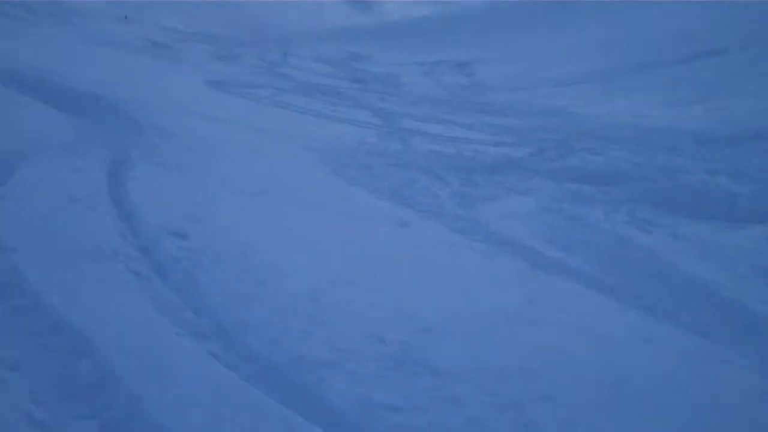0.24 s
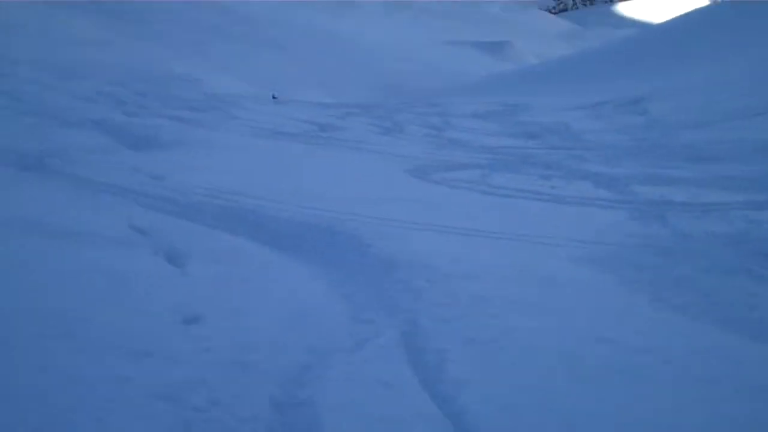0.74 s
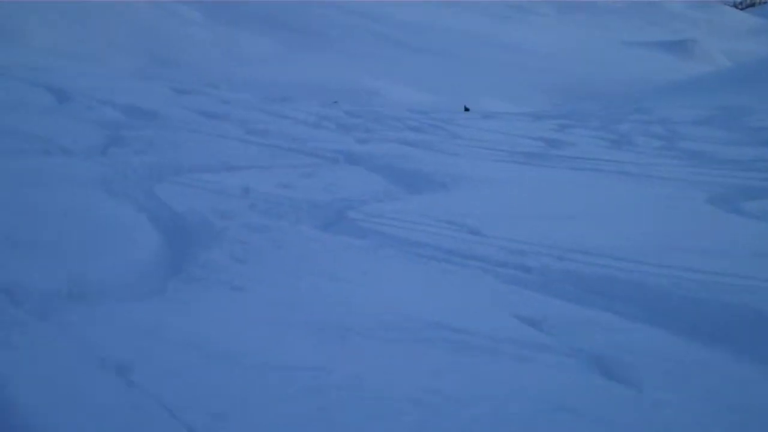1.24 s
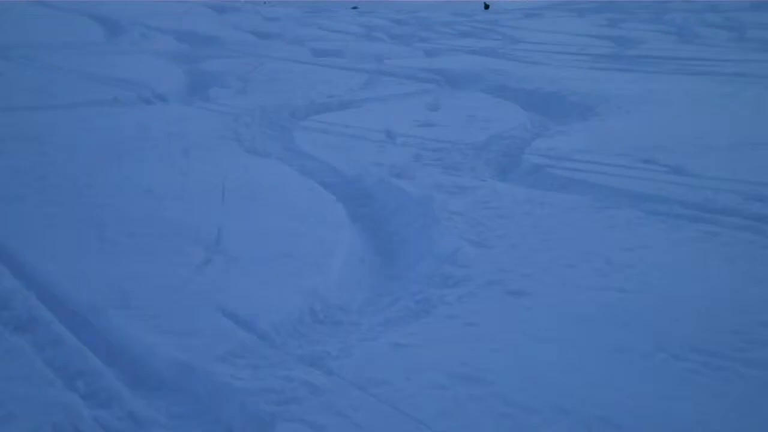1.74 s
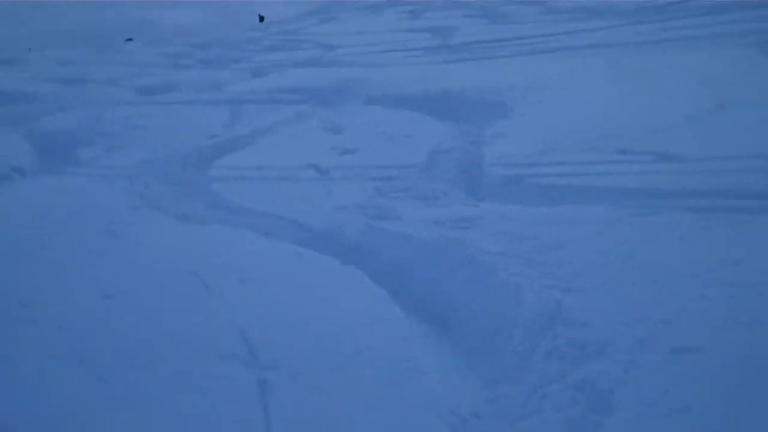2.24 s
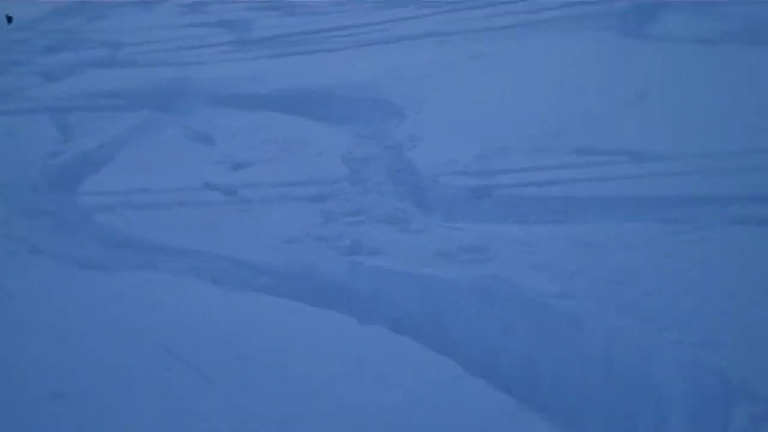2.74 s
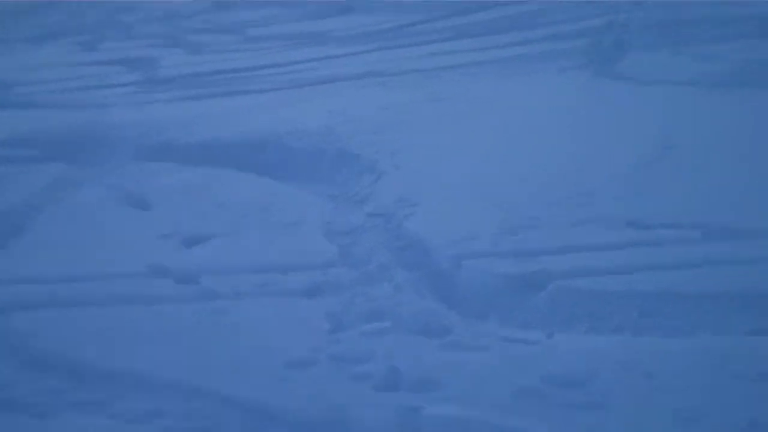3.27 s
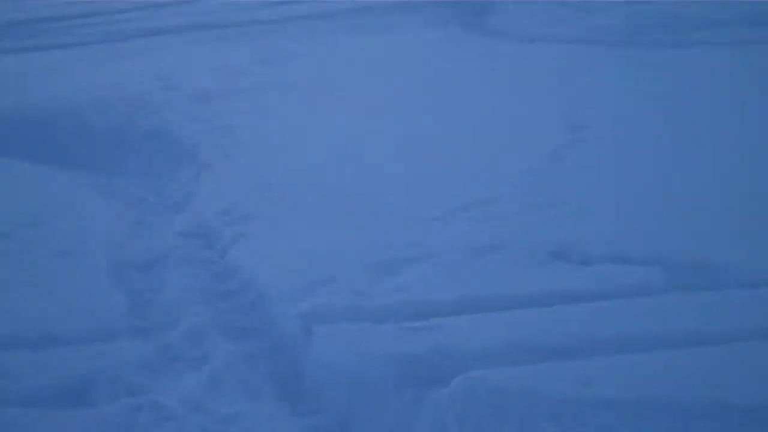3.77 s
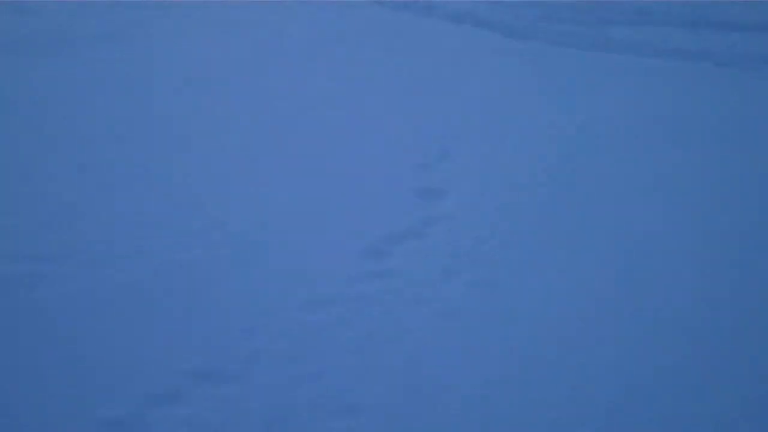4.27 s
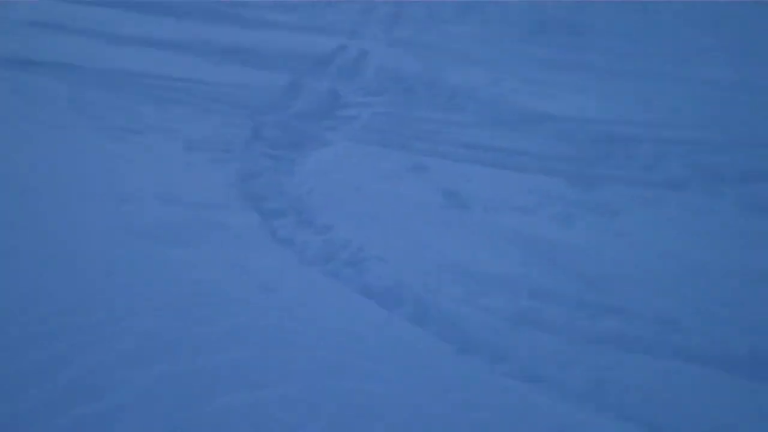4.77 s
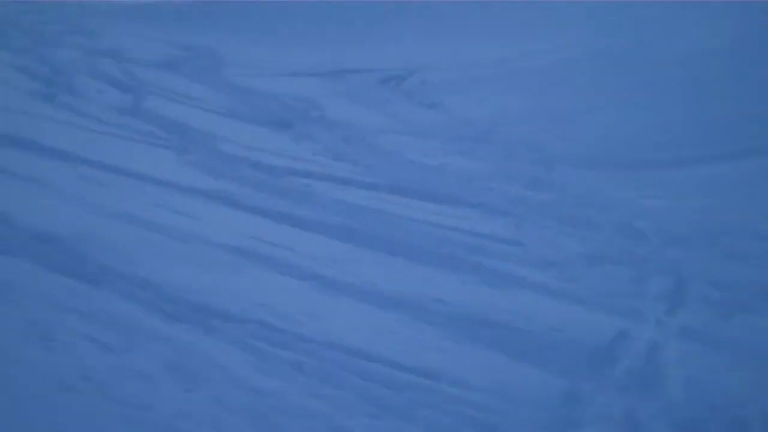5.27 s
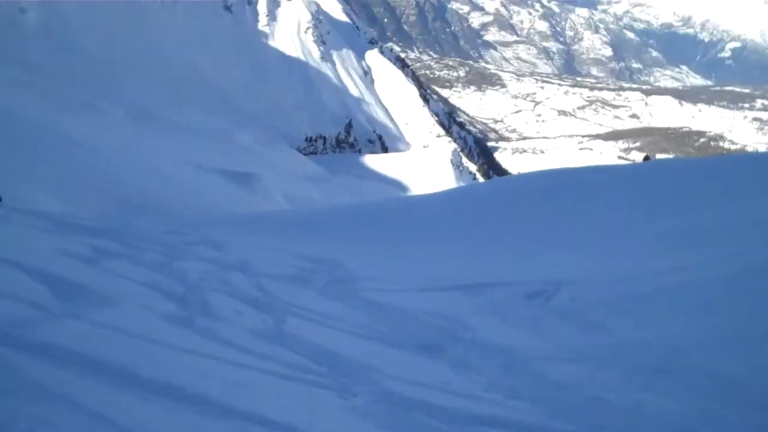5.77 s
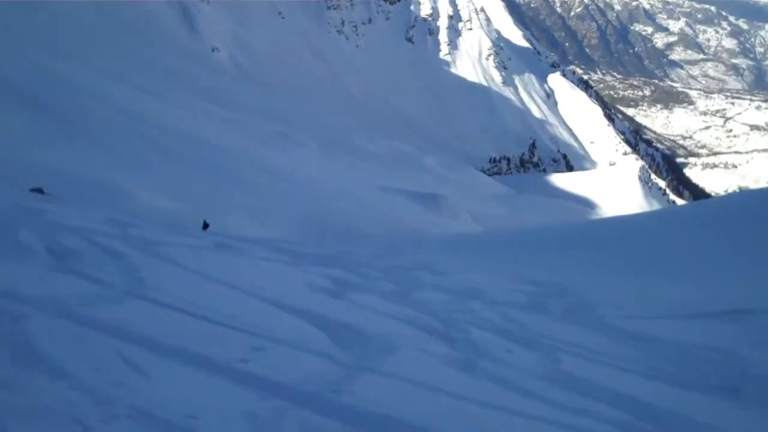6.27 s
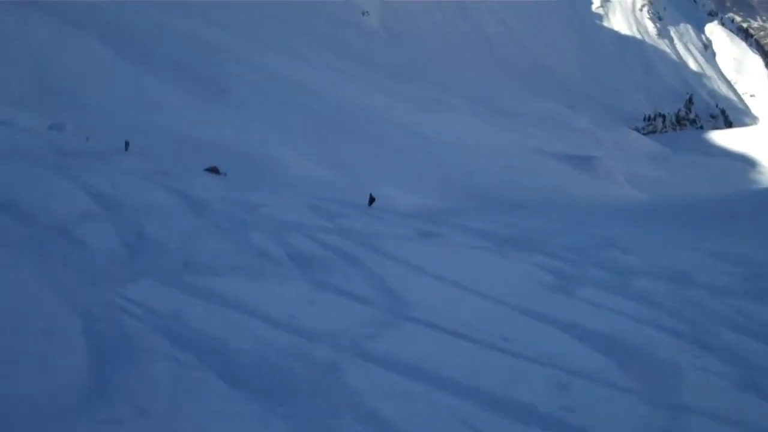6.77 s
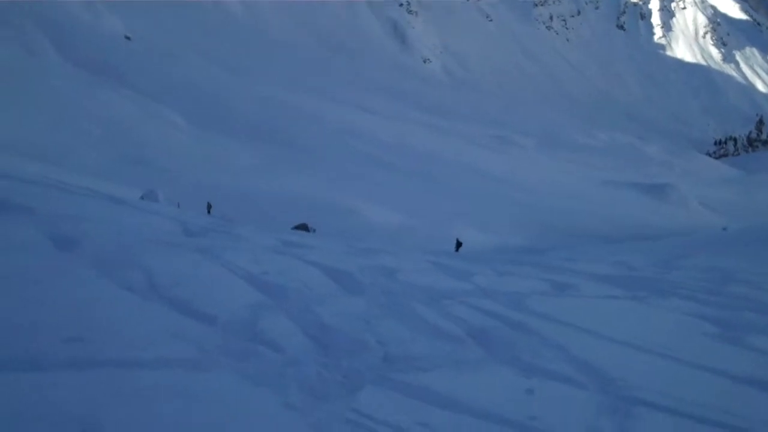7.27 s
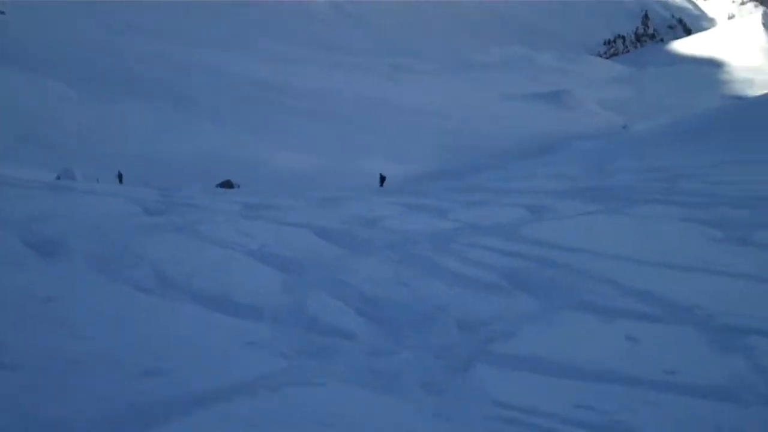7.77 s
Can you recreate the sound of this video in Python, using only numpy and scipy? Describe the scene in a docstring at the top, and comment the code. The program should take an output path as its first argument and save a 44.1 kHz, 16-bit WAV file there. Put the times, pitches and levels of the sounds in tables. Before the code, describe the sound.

Skis slide over snow for about eight seconds, heard close from a microphone carried by the skier. A bright, grainy hiss runs throughout, swelling and easing with the pressure on the skis. Short scrapes with a thin ringing tone flicker through it as the edges bite into crust. The hiss is loudest in the first 0.6 seconds. At about 1 second the gear gives a single hard plastic knock. The sliding eases between 2 and 3.5 seconds, then firms up with a cluster of scrapes from about 3.7 to 5 seconds. It swells again from 5.5 to 6.3 seconds and turns quieter after 7, with a few last scrapes. Faint, dull ticks fall near 1.3, 2.2, 2.6, 4.2 and 7.5 seconds. Air rushes past evenly the whole time, with soft, low gusts buffeting the microphone, most noticeably at the start, around 5 to 6 seconds and at the end.

```python
"""On a ski slope, heard through one microphone carried by the skier.
Thrown snow hisses, crystals striking the bases excite the resonances of the skis, and stick-slip
friction makes two modes sing; all grow louder with pressure and as the edges bite into crust.
The gear knocks once and a few dull ticks sound. Turbulent air rushes past and softly buffets
the microphone, over faint amplifier noise."""
import sys
import numpy as np
from scipy import signal
from scipy.io import wavfile
from scipy.ndimage import uniform_filter1d

SR = 44100
rng = np.random.default_rng(int(sys.argv[2]) if len(sys.argv) > 2 else 0)


def generate_wav(signal):
    """Clip the signal to [-1, 1] and save it as 16-bit WAV at the path in sys.argv[1]."""
    frames = np.transpose(np.atleast_2d(signal))
    scaled = np.clip(frames, -1, 1) * 32767
    pcm = np.round(scaled).astype(np.int16)
    wavfile.write(sys.argv[1], SR, pcm)


N = 353670

# Snow underfoot: t/s, firmness (0-1), f of the first mode/Hz, spray tilt/(dB per octave), sizzle/dB
SNOW_STATE = [(0, 0.84, 2200, 0.5, -3), (.25, 0.27, 2250, 3.5, -0.2), (.5, 0.4, 2300, -0.2, 0),
              (.62, 0.3, 2280, 0, -0.5), (.87, 0.3, 2300, 1.2, 1), (1.32, .3, 2170, 1.7, .3),
              (1.72, 0.53, 2290, -1, -0.5), (2.2, 0.2, 2230, -1.7, 0.2), (2.45, 0.53, 2220, -1.5, 0.2),
              (2.95, 0.3, 2260, -1, 1), (3.3, 0.54, 2210, 0.2, 0.7), (3.8, 0.7, 2230, 0, -0.2),
              (4.05, 0, 2170, 0.5, 0.5), (4.35, 0.44, 2280, 0.5, -.3), (4.752, 1, 2290, -1.2, 0.2),
              (5.46, 0.65, 2270, -2, 1.3), (5.55, .3, 2220, -1.3, 1.5), (5.75, 0.16, 2170, 0.3, 2.2),
              (6.25, 0.3, 2170, 1.7, 2.3), (6.4, 0, 2200, 1.7, 0.5), (6.65, .2, 2190, 2, 0.7),
              (6.75, 0.5, 2220, 0, 0), (7.45, 0.06, 2210, -0.4, 1.7), (8.02, 0.1, 2170, -1, 0.5)]
def skis():
    """Sliding friction: one contact force, varied by uneven snow, drives spray, scrape and modes."""
    press_db = pressure()
    firmness, mode_hz, _, _ = curves(SNOW_STATE)
    scrape_bite_db, first_bite_db, second_bite_db = edge_bites()
    bumps = wander(fastest_hz=23.5)
    return (spray(press_db, scrape_bite_db, bumps)
            + scrape(press_db, scrape_bite_db, bumps, firmness)
            + first_mode(press_db, first_bite_db, bumps, firmness, mode_hz)
            + second_mode(press_db, second_bite_db, bumps))


def snow_shading(hz, t):
    """Spectral tilt: finer snow favours the treble, and dry crystals add sizzle near 8 kHz."""
    times, _, _, tilt_db, sizzle_db = np.transpose(SNOW_STATE)
    octaves = np.log2((hz + 1) / 8000)
    sizzle_band = np.exp(-(octaves / .4) ** 2)
    return np.interp(t, times, tilt_db) * octaves + np.interp(t, times, sizzle_db) * sizzle_band


# Spectrum of thrown snow: f/Hz, relative spectral level/dB
SPRAY_SPECTRUM = [(1200, -17.5), (3000, -4), (4500, -7), (6000, -6.5), (7800, -5.5), (10000, -9.5),
                  (12000, -11.5), (14500, -14)]
def spray(press_db, bite_db, bumps):
    """Incoherent summation: countless thrown grains add up to a broadband hiss."""
    level_db = MEAN_SPRAY_DB + press_db + 0.097 * bite_db + 0.42 * bumps
    return gain_of(level_db) * noise(SPRAY_SPECTRUM, patchy_db=0.87, size=512, shading=snow_shading)


# Broad resonances of the ski: f/Hz, bandwidth of the narrower filter stage/Hz, relative gain/dB
SKI_RESONANCES = [(1550, 430, 10.5), (1896, 190, 3), (2150, 710, -4), (2810, 1500, 14), (3636, 950, 15),
                  (4080, 760, -4.5)]
def scrape(press_db, bite_db, bumps, firmness):
    """Forced vibration: crystal impacts of random strength excite the ski, more so on firm snow."""
    impact_db = 2.74 * np.minimum(rng.exponential(1, N), 6)
    crystals = gain_of(impact_db) * rng.standard_normal(N)
    vibration = sum(gain_of(db) * resonate(resonate(crystals, hz, width), hz, 1.73 * width)
                    for hz, width, db in SKI_RESONANCES)
    level_db = -49 + 1.18 * press_db + 0.5 * firmness + bite_db + 0.72 * bumps
    return gain_of(level_db) * unit_rms(vibration)


def first_mode(press_db, bite_db, bumps, firmness, mode_hz):
    """Damping: deep snow broadens this resonance of the ski, and a firm track lets it ring."""
    driven = resonate(stick_slip(bumps), mode_hz, width_hz=670)
    free = unit_rms(resonate(driven, mode_hz, width_hz=115))
    damped = unit_rms(resonate(driven, mode_hz, width_hz=510))
    free_share = 0.27 + 0.73 * firmness
    level_db = -56 + 0.78 * press_db + 9.5 * firmness + bite_db + 0.84 * wander(fastest_hz=22)
    return gain_of(level_db) * (free_share * free + (1 - free_share) * damped)


def second_mode(press_db, bite_db, bumps):
    """Resonance: friction drives a lower mode of fixed frequency, whose level flutters."""
    driven = resonate(stick_slip(bumps), 1920, width_hz=230)
    ringing = resonate(driven, 1925, width_hz=430)
    level_db = -60 + 1.23 * press_db + bite_db + 1.5 * wander(fastest_hz=14)
    return gain_of(level_db) * unit_rms(ringing)


def stick_slip(bumps):
    """Irregular stick-slip friction: a white-noise force of fluctuating strength."""
    return gain_of(.5 * bumps + .6 * wander(fastest_hz=45)) * rng.standard_normal(N)


# Load on the skis, expressed as the spray it throws: t/s, level/dB
SKI_LOAD = [(0, -36.5), (.11, -38), (.36, -33.5), (.6, -36), (.76, -40), (1.1, -41), (1.36, -39.5),
            (1.6, -40.5), (1.72, -39), (1.94, -42), (2.3, -46), (2.36, -42.5), (2.5, -41), (2.8, -43),
            (3.1, -42.5), (3.2, -45.5), (3.51, -45), (3.55, -42), (3.75, -39.5), (3.93, -42.5),
            (4.27, -40.5), (4.36, -38.5), (4.6, -40), (4.75, -41.5), (5.1, -43), (5.3, -40), (5.63, -38.5),
            (5.85, -38.5), (5.95, -36.5), (6.27, -36), (6.39, -38.5), (6.75, -40.5), (6.93, -45),
            (7.19, -45), (7.435, -49), (7.46, -45.5), (7.68, -46), (7.82, -50.5), (7.86, -48), (7.89, -46),
            (8.02, -47)]
MEAN_SPRAY_DB = -42
def pressure():
    """Contact pressure of the skis on the snow, in dB about its mean."""
    return curves(SKI_LOAD)[0] - MEAN_SPRAY_DB


# Edges cutting crust: t/s, duration/s, gain of scrape/dB, of first mode/dB, of second mode/dB
EDGE_BITES = [(0.282, 0.034, 2.5, 10, 4), (0.328, .02, 7, 2, 4), (0.357, 0.063, 6, 2, 5),
              (.5, 0.024, 5.5, 4, 15), (.9, 0.033, 6.5, 6, 2), (1.072, 0.037, -0.5, 8, 2),
              (1.5, 0.12, 3, 4.5, 5), (1.68, 0.13, 2, 4, 8), (1.99, 0.047, 5, 5, 3),
              (2.358, 0.11, 0, 6.5, 9), (2.594, 0.051, 3, 7, 2), (2.855, .03, 7, 2, 5),
              (2.896, 0.13, 3.5, 7, 10), (3.29, 0.025, 2, 6, 2), (3.346, 0.032, 1, 9.5, 0),
              (3.654, 0.047, 4.5, 8, 11), (3.727, .08, 1, 3, 5), (3.833, .07, 3, 2, -3),
              (4.13, 0.037, 8, 9, 8), (4.198, 0.027, 3, 2, 3), (4.26, 0.037, 2, 5, 11),
              (4.32, 0.083, 6, 8, 4), (4.424, 0.071, 5, 6, 2), (4.53, .07, 4, 8.5, 6),
              (4.62, 0.1, 2.5, 5, 11.5), (4.826, 0.045, 1, 5.5, 2), (4.916, 0.047, -11, 5, 9),
              (5.114, 0.031, 0, 6, 0), (5.317, 0.045, 3, 0, -4), (5.387, 0.077, -0.5, 2, -3),
              (5.617, 0.12, 3, 7, 9), (5.924, 0.048, 5, 4, -5), (6.03, 0.057, -4, 5, -1),
              (6.144, 0.037, -0.5, 2, 3), (6.22, 0.051, 1, 7, -4), (6.68, 0.12, 1, 4, 4),
              (7.466, 0.086, 4.5, 3, 3), (7.546, .05, 5.5, 7, 3), (7.87, .07, 5, 6, 8)]
def edge_bites(attack_s=0.013, release_s=0.039):
    """Amplitude modulation: each bite sets in quickly, holds and lets go; three gains in dB."""
    t, gains_db = np.arange(N) / SR, np.zeros((3, N))
    for start, length, *bite_db in EDGE_BITES:
        trapezoid = np.minimum((t - start) / attack_s, (start + length - t) / release_s) + .5
        gains_db += np.outer(bite_db, np.clip(trapezoid, 0, 1))
    return gains_db


# Blows on the gear: t/s, peak level/dB
GEAR_BLOWS = [(.9629, -21.5)]
# Modes of the gear: f/Hz, relative level/dB, T60/s
GEAR_MODES = [(830, -14, .03), (980, -3.5, .045), (1460, -3, .045), (1780, -4, .04), (2000, -6, .03),
              (2300, -6, .025), (2740, -2, .028), (3200, -6, .025), (4750, -1, .015)]
def gear_knock():
    """Impulse response: a blow and two rebounds ring hard plastic too small to radiate bass."""
    t = np.arange(SR // 10) / SR
    ring = sum(gain_of(db - 60 * t / t60) * np.sin(2 * np.pi * hz * t) for hz, db, t60 in GEAR_MODES)
    ring = signal.sosfilt(signal.butter(4, 650, "highpass", fs=SR, output="sos"), ring)
    blows = np.zeros(N)
    for start, peak_db in GEAR_BLOWS:
        for delay_s, rebound_db in (0, 0), (.0041, -8), (.0078, -7):
            blows[round((start + delay_s) * SR)] = gain_of(peak_db + rebound_db)
    return signal.oaconvolve(blows, ring / abs(ring).max())[:N]


# Small impacts: t/s, initial level/dB, f/Hz
DULL_TICKS = [(1.326, -40, 746), (2.197, -42, 1030), (2.641, -38, 1000), (4.201, -37, 1970),
              (7.271, -47, 780), (7.564, -46, 1180)]
def ticks(t60=0.05):
    """Damped oscillation: each tick dies quickly, like a lump of snow striking a boot."""
    out, t = np.zeros(N), np.arange(SR // 50) / SR
    for start, db, hz in DULL_TICKS:
        out[round(start * SR):][:len(t)] += gain_of(db - 60 * t / t60) * np.sin(2 * np.pi * hz * t)
    return out


# Headwind at mean ski pressure: t/s, level/dB
HEADWIND_LEVEL = [(0, -48.5), (.4, -47), (.9, -49), (1.6, -48.5), (2.15, -49.5), (2.5, -47.5), (3.0, -48),
                  (3.5, -49), (4.6, -48), (5.4, -47.5), (6.2, -47.5), (6.5, -50), (7.3, -49), (8.02, -48)]
# Spectrum of the passing air: f/Hz, relative spectral level/dB
RUSH_SPECTRUM = [(150, -50), (300, -19), (500, -10), (750, -6.5), (1050, -5), (1500, -6.5), (2500, -9.5),
                 (5000, -57.5)]
def air_rush(eddies):
    """Flow noise: air passes the housing with an even rush that partly follows the ski pressure."""
    level_db = curves(HEADWIND_LEVEL)[0] + 0.25 * pressure() + 0.46 * eddies
    return gain_of(level_db) * noise(RUSH_SPECTRUM, patchy_db=0.96, size=1024)


# Gusts on the microphone: t/s, duration/s, peak gain of buffeting/dB, of rumble/dB
WIND_GUSTS = [(-.1, 0.31, 8, 15), (0.196, 0.71, 7, 5), (0.996, 0.83, 1.5, 15), (1.3, 0.41, 5, 0),
              (2.05, 0.37, 2.5, 7), (2.3, 0.32, 6.5, 4), (3.45, 0.67, 3, 8), (4.4, 0.97, 6, 3),
              (4.68, 0.55, 2.5, 0), (5.094, 0.98, 6.5, 10), (5.75, 0.89, 0.5, 1), (6.95, .25, -2, 9),
              (7.2, .3, -5, 7), (7.55, .5, -3, 7), (7.866, 0.51, 10, 4)]
# Spectra of the buffeting and the rumble: f/Hz, relative spectral level/dB
BUFFET_SPECTRUM = [(70, -36), (120, -6), (170, 1), (280, 3), (450, -1), (800, -19)]
RUMBLE_SPECTRUM = [(25, -7), (50, -7.5), (90, -3.5), (140, -8.5), (220, -31)]
def buffeting(eddies):
    """Turbulent pressure at the microphone port: thumps and rumble swell faster than they fade."""
    t, gust_db = np.arange(N) / SR, np.zeros((2, N))
    for start, length, *peak_db in WIND_GUSTS:
        progress = np.clip((t - start) / length, 0, 1)
        gust_db += np.outer(peak_db, np.sin(np.pi * progress ** 0.69))
    thumps = gain_of(-64.5 + gust_db[0] + 1.23 * eddies) * noise(BUFFET_SPECTRUM, patchy_db=2.5)
    rumble = gain_of(-78 + gust_db[1]) * noise(RUMBLE_SPECTRUM, patchy_db=1.2)
    return thumps + rumble


def amplifier_noise():
    """Electronic self-noise: faint and strongest at the lowest frequencies."""
    spectrum = [(10, 16), (60, -17), (200, -8), (600, -4)]  # f/Hz, relative spectral level/dB
    return gain_of(-72.5) * noise(spectrum, patchy_db=0.8)


def noise(spectrum, patchy_db, size=2048, shading=None):
    """Spectral shaping: coloured noise of unit RMS with drifting louder and softer patches."""
    hz = np.fft.rfftfreq(size, 1 / SR)
    real, imag, patches = rng.standard_normal((4 * N // size + 5, len(hz), 3)).T
    patches = unit_rms(uniform_filter1d(uniform_filter1d(patches, size=8, axis=0), size=12, axis=1))
    knot_hz, knot_db = np.transpose(spectrum)
    colour_db = np.interp(np.log(hz + 1), np.log(knot_hz), knot_db, left=-90, right=-90)[:, None]
    if shading:
        frame_times = np.arange(real.shape[1]) * size / 4 / SR
        colour_db = colour_db + shading(hz[:, None], frame_times)
    spectra = (real + 1j * imag) * gain_of(colour_db + patchy_db * patches)
    return unit_rms(signal.istft(spectra, nperseg=size, noverlap=3 * size // 4)[1][:N])


def resonate(x, hz, width_hz):
    """Heterodyning: shifting hz to zero, smoothing and shifting back gives a unit-gain resonance."""
    carrier = np.exp(2j * np.pi * np.cumsum(hz * np.ones(len(x))) / SR)
    pole = np.exp(-np.pi * width_hz / SR)
    return 2 * (carrier * signal.lfilter([1 - pole], [1, -pole], x / carrier)).real


def wander(fastest_hz):
    """Random fluctuation: low-passed noise of unit RMS."""
    lowpass = signal.butter(2, fastest_hz, fs=SR, output="sos")
    return unit_rms(signal.sosfilt(lowpass, rng.standard_normal(N)))


def curves(rows):
    """Linear interpolation of each column over time."""
    times, *columns = np.transpose(rows)
    return [np.interp(np.arange(N) / SR, times, column) for column in columns]


def gain_of(db):
    """Amplitude ratio of a level."""
    return 10 ** (np.asarray(db) / 20)


def unit_rms(x):
    """Normalisation to unit power."""
    return x / np.sqrt(np.mean(x ** 2) + 1e-20)


def scene():
    """Superposition: all sources add at one microphone, which feeds both channels."""
    eddies = wander(fastest_hz=8.1)
    return np.tile(skis() + gear_knock() + ticks() + air_rush(eddies) + buffeting(eddies), (2, 1))


def record(dry, cutoff_hz=13930, dc_offset=-.0005):
    """Band limiting: sound, amplifier noise and a steady offset pass through a steep low-pass."""
    lowpass = signal.firwin(1023, cutoff_hz, window=("kaiser", 10), fs=SR)
    return signal.oaconvolve(dry + amplifier_noise() + dc_offset, lowpass[None], "same")


dry = scene()
out = record(dry)
generate_wav(out)
```